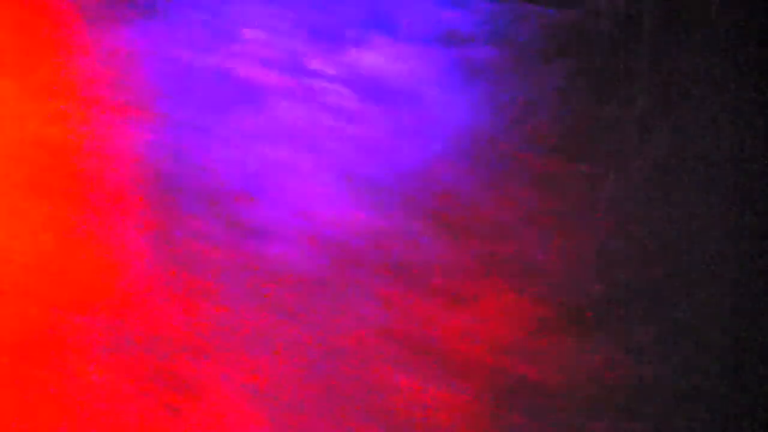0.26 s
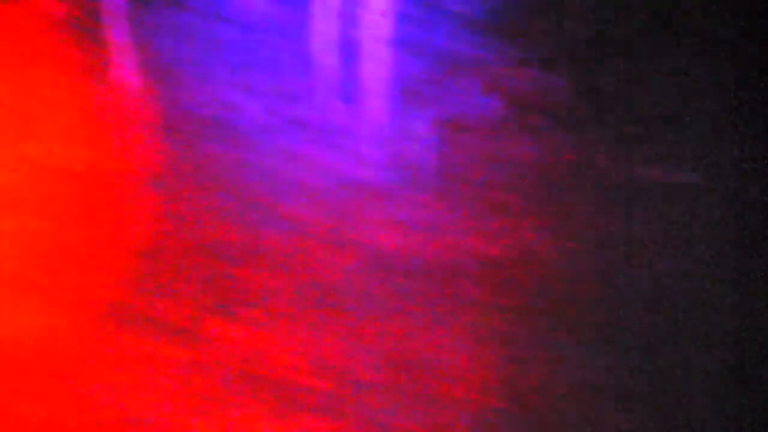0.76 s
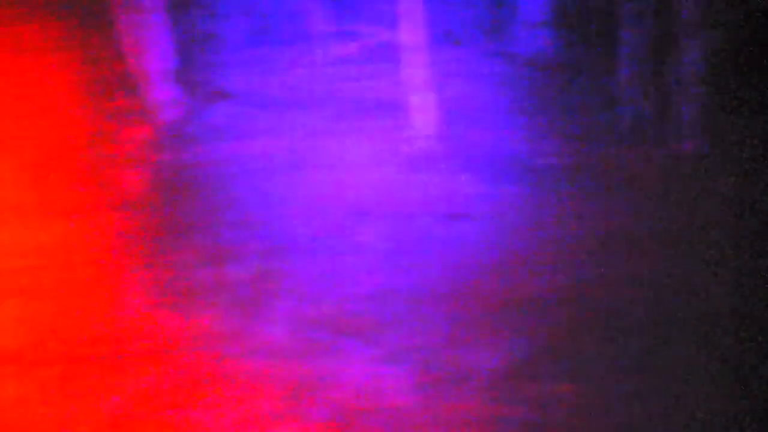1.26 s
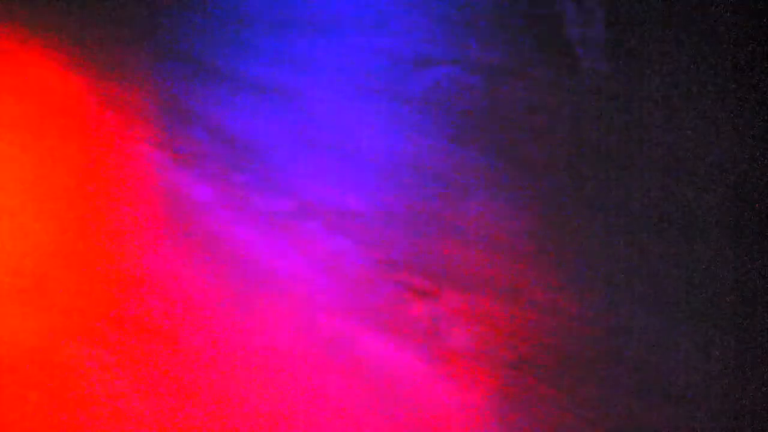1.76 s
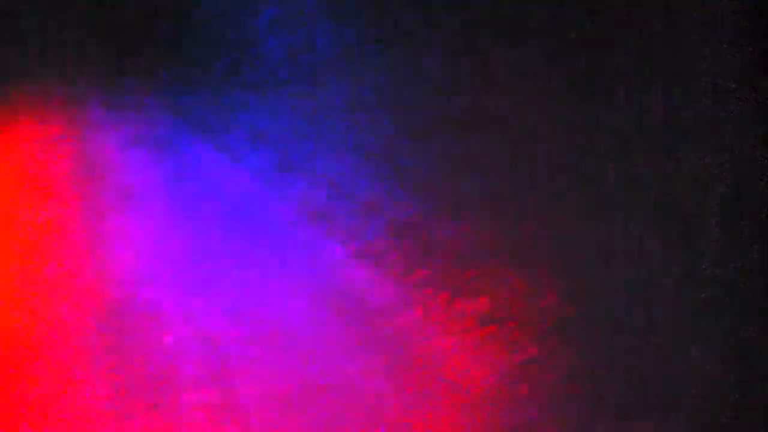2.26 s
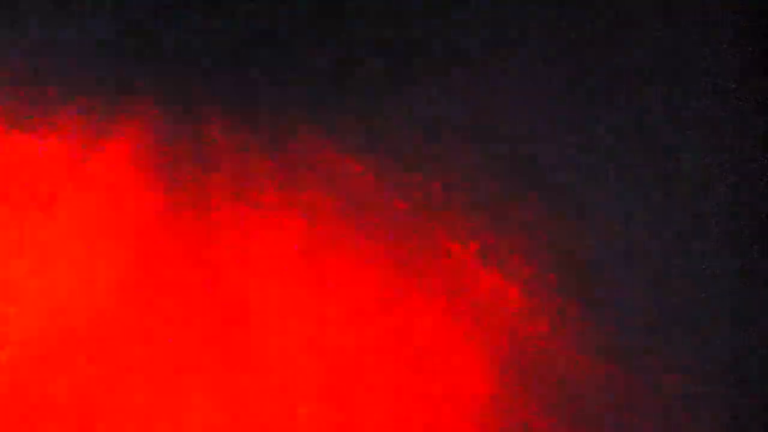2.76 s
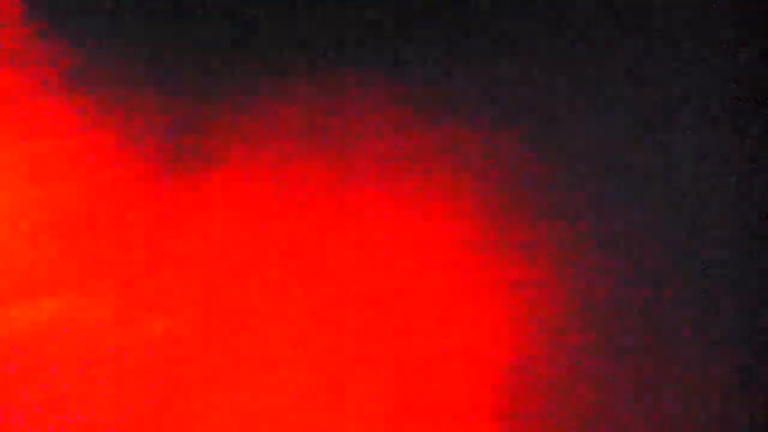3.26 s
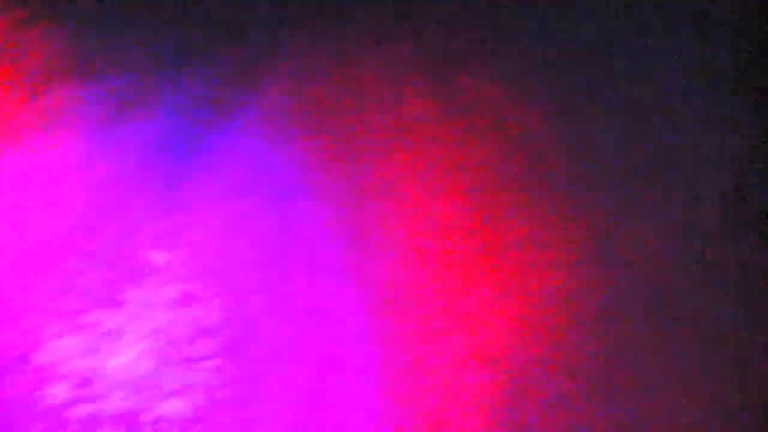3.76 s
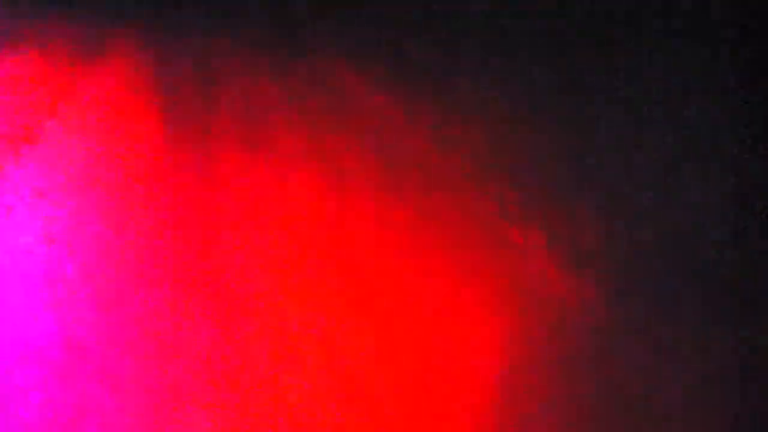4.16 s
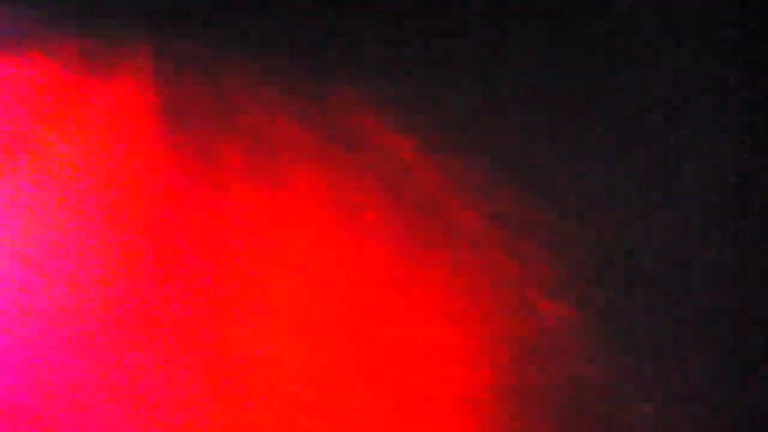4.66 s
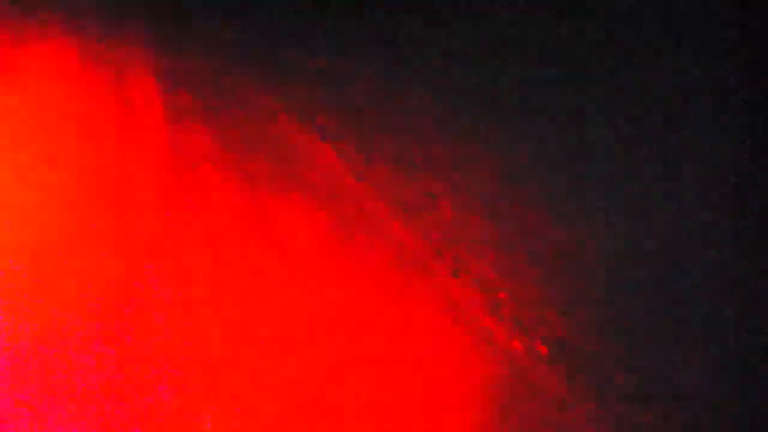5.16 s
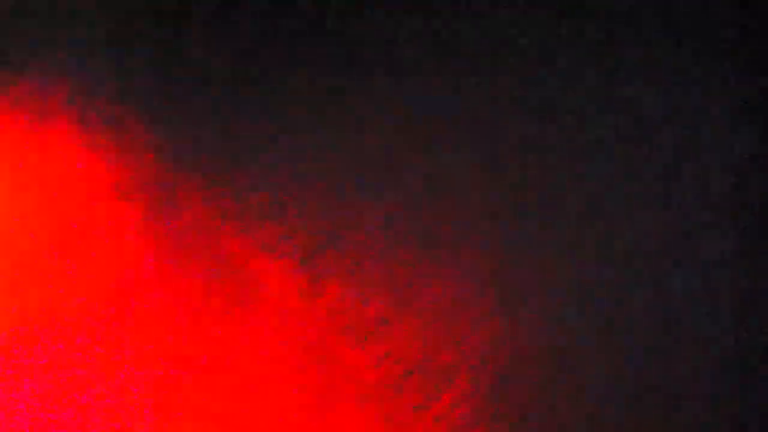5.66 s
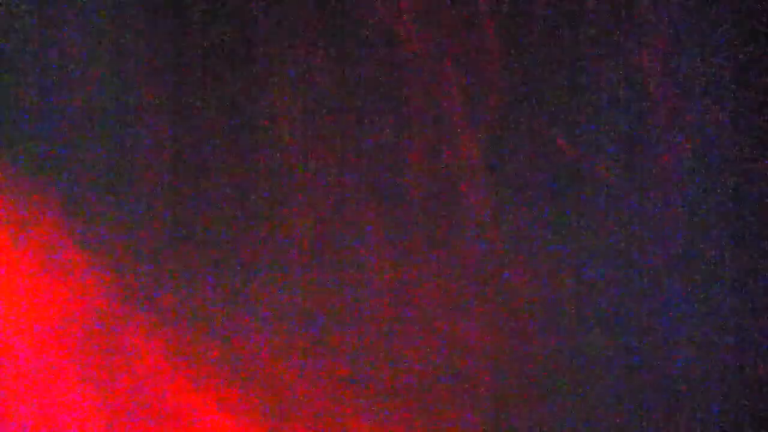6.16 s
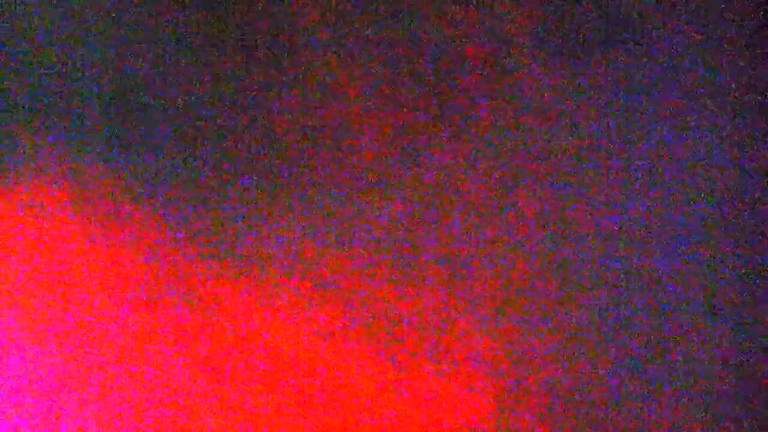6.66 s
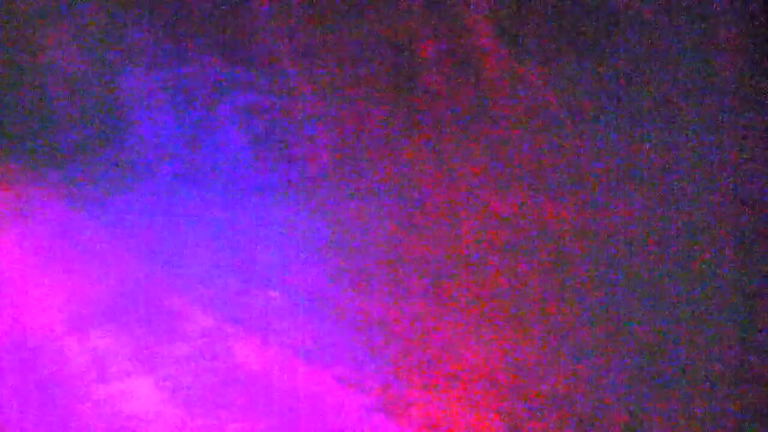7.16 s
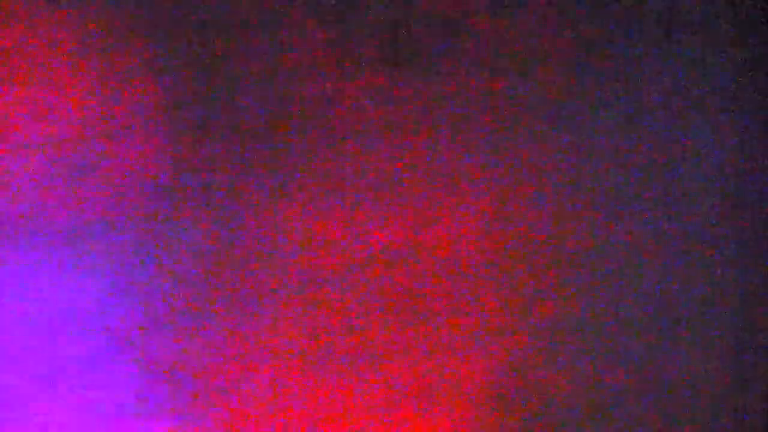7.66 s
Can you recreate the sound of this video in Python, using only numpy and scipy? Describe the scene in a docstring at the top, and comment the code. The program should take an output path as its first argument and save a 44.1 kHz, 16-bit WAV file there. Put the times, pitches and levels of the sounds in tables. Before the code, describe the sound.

Close footsteps scuff through dry leaves with crisp crackles and small twig snaps, sparse at first and much busier after about four seconds. Hard hollow plastic knocks and dull handling thuds interrupt. Crickets chirp and trill, high and thin, mostly to the left, over a distant insect chorus and faint hiss. Open night woodland with slight tree echo, captured by a handheld stereo microphone.

```python
"""Night walk through leaves

A walker carries a camera along a leafy woodland path. Leaves crush, crackle and rustle as bursts of noise
and snap as short rings; gear knocks and rubs ring the plastic housing's modes, and thuds are low noise.
Three chirping and three faster trilling crickets, and one that pips, are gliding sines with tree echoes;
behind them lie a far chorus of many sines and a bed of air and hiss made of filtered noise."""
import sys
import numpy as np
from scipy import signal
from scipy.fft import rfft, irfft
from scipy.io import wavfile
from scipy.ndimage import uniform_filter1d

SR = 44100
rng = np.random.default_rng(int(sys.argv[2]) if len(sys.argv) > 2 else 0)


def wrap_up_sound(samples):
    """Save the sound to the file named by the first command line argument, as 16-bit audio."""
    columns = np.atleast_2d(samples).T
    # keep every value between -1 and 1, then stretch to whole-number steps
    tamed = np.clip(columns, -1, 1)
    steps = np.round(tamed * 32767).astype(np.int16)
    wavfile.write(sys.argv[1], SR, steps)


N = 349272  # samples in the scene


def amp(db):
    """Decibels to a linear gain."""
    return 10 ** (np.asarray(db) / 20)


def evened(x):
    """Scale to an RMS of 1."""
    return x / np.sqrt(np.mean(x ** 2) + 1e-20)


def curves(rows):
    """Columns of a timed table, interpolated at every sample."""
    s, *columns = np.transpose(rows)
    return [np.interp(np.arange(N) / SR, s, c) for c in columns]


def panned(x, pan_db):
    """Stereo pair with the left pan_db louder than the right."""
    return np.array([x * amp(pan_db / 2), x * amp(-pan_db / 2)])


def add(mix, s, sound):
    """Lay a stereo sound into the mix at s seconds."""
    part = mix[:, max(round(s * SR), 0):][:, :sound.shape[1]]
    part += sound[:, :part.shape[1]]


def coloured(x, points):
    """Causal minimum-phase filter with the gain curve points (pitch_hz, gain_db)."""
    f, db = np.transpose(points)
    bins_hz = abs(np.fft.fftfreq(4096, 1 / SR))
    log_gain = np.interp(np.log(bins_hz + 1), np.log(f + 1), db) * np.log(10) / 20
    spectrum = np.exp(np.conj(signal.hilbert(log_gain)))
    taps = np.fft.ifft(spectrum).real[:2048]
    return signal.oaconvolve(x, taps[None], axes=1)[:, :N]


def rings(modes):
    """Sum of exponentially dying sine modes, peak 1."""
    t = np.arange(SR // 8) / SR
    x = sum(amp(db - 60 * t / t60) * np.sin(2 * np.pi * hz * t) for hz, db, t60 in modes)
    return x / abs(x).max()


def swells(s, held, peak_db, rest_db, rise_db_s, fall_db_s):
    """Gain of events that rise, hold and fall over a resting level, summed in power."""
    coarse = np.arange(0, N, 32)
    t = coarse / SR - np.asarray(s)[:, None]
    rise_db = rise_db_s * np.minimum(t, 0)
    fall_db = fall_db_s * np.maximum(t - np.asarray(held)[:, None], 0)
    db = np.asarray(peak_db)[:, None] + rise_db - fall_db
    gain = np.sqrt((amp(db) ** 2).sum(0) + amp(rest_db) ** 2)
    return np.interp(np.arange(N), coarse, gain)


def trees(x, t60=.4):
    """Trunks scatter sound back: sparse taps of random sign, other ones per channel."""
    slots = np.arange(400, SR // 3, 20)
    t = slots + rng.integers(0, 20, (2, len(slots)))
    taps = np.zeros((2, SR // 3 + 20))
    echoes = rng.choice([-1., 1.], t.shape) * amp(-60 * t / SR / t60)
    np.put_along_axis(taps, t, echoes, 1)
    return signal.oaconvolve(x, taps / np.linalg.norm(taps[0]), axes=1)[:, :N]


# scuffs of a shoe through the leaves: start_s [s], held_s [s],
# dull crush_db [dB], crisp crackle_db [dB], bright rustle_db [dB]
SCUFFS = [(0.09, 0.22, -50.5, -55.5, -55), (0.662, 0.033, -37, -40.5, -39), (1.361, 0.017, -44.5, -48, -46),
          (1.44, 0.025, -45.5, -58, -49), (2.04, 0, -45.5, -51, -62), (2.11, 0.0053, -46, -49, -62),
          (2.764, 0.0027, -48.5, -43, -43), (3.26, 0.19, -56, -63, -55), (3.314, 0.0087, -44, -43, -58),
          (3.841, 0.0049, -48, -49, -43.5), (3.9, 0.17, -52, -60, -53), (4.224, 0.13, -47.5, -76, -59),
          (4.366, 0.011, -50, -64, -40), (4.466, .12, -46.5, -46, -49), (4.625, 0.015, -50.5, -52, -45),
          (4.74, 0.071, -59, -45, -41), (4.812, 0.024, -52, -40, -42), (4.869, 0, -40.5, -40, -60),
          (4.905, 0, -45, -38, -45), (4.945, 0, -44, -48, -32.5), (5.057, 0.014, -39.5, -35, -32),
          (5.12, 0.11, -49.5, -49, -51), (5.3, 0.11, -54, -70, -58), (5.462, 0.029, -40.5, -55, -42.5),
          (5.501, 0, -34.5, -41, -37.5), (5.591, 0.017, -48.5, -46, -52), (5.657, 0.016, -46.5, -56, -51),
          (5.72, 0.0089, -43, -44.5, -45), (5.8, 0.011, -49, -37, -50), (5.85, 0.09, -52, -48.5, -48),
          (5.962, 0.058, -48.5, -53, -51), (6.11, 0.027, -59, -45, -46), (6.18, 0, -28, -24.5, -30.5),
          (6.226, 0, -61, -46, -38), (6.349, 0.016, -42, -42, -59), (6.828, 0, -42.5, -63, -41.5),
          (6.915, 0.02, -42.5, -49, -46), (6.97, 0.073, -53.5, -57, -51), (7.443, 0, -45.5, -56, -47),
          (7.535, 0, -47, -50, -51)]
# each triple: crush, crackle, rustle
SCUFF_RISE_DB_S, SCUFF_FALL_DB_S = (648, 702, 750), (400, 554, 600)
SETTLING_DB = (-64.5, -64.5, -58)  # resting level between scuffs
JOLT_DB, JOLT_S = -31.5, 0.0071  # a dull crush follows each knock, this far under it and this late


def scuffing():
    """Gains of crush, crackle and rustle as the shoe pushes through and the leaves settle."""
    s, held, *levels = np.transpose(SCUFFS)
    rules = zip(levels, SETTLING_DB, SCUFF_RISE_DB_S, SCUFF_FALL_DB_S)
    crush, crackle, rustle = (swells(s, held, *rule) for rule in rules)
    knock_s, knock_db = np.transpose(KNOCKS)[:2]
    jolts = swells(knock_s + JOLT_S, 0 * knock_s, knock_db + JOLT_DB, -np.inf,
                   SCUFF_RISE_DB_S[0], SCUFF_FALL_DB_S[0])
    return np.hypot(crush, jolts), crackle, rustle


def grains():
    """Many tiny breaks in clumps, a few large, each a noise burst dying over about half a millisecond."""
    clump = amp(3.5 * evened(uniform_filter1d(rng.standard_normal(N), 250)))
    size_db = 3 * np.minimum(rng.exponential(1, N), 4)
    breaks_now = rng.random(N) < 1500 * clump / SR
    burst = signal.lfilter([1], [1, -.96], amp(size_db) * breaks_now)
    shared, side = rng.standard_normal((2, N))
    return burst * (panned(shared, -2.6) + 0.13 * np.array([side, -side]))


# tone of each leaf layer: pitch_hz [Hz], gain_db [dB]
CRUSH = [(100, -6.5), (350, 4.5), (700, -0.5), (1090, 1), (1550, -4), (2500, -11), (9000, -112)]
CRACKLE = [(600, -32), (1550, -7), (2100, 5), (3180, -1), (4700, -0.5), (7000, -30)]
RUSTLE = [(1500, -30), (3500, -6), (4750, 0), (6400, -8), (8200, -17), (10600, -28), (15500, -44)]


def trodden_leaves():
    """Crush, crackle and rustle share the same tiny breaks, each through its own tone filter."""
    breaks = grains()
    crush, crackle, rustle = scuffing()
    # leaves also slide on leaves
    sliding = evened(breaks) + 1.1 * rng.standard_normal((2, N)) * amp([[-1.5], [1.5]])
    out = crush * evened(coloured(breaks, CRUSH))
    out += crackle * evened(coloured(sliding, CRACKLE))
    return out + rustle * evened(coloured(sliding, RUSTLE))


# single snaps of leaves and twigs: start_s [s], level_db [dB], pitch_hz [Hz],
# tick_db [dB relative to the body's level], left_minus_right_db [dB]
SNAPS = [(0.089, -19.5, 4230, -9.5, -1), (0.259, -23, 4150, -21, -2), (0.432, -16.5, 1400, -17, -2),
         (0.652, -22, 950, -25, 1), (0.677, -14.5, 4440, -21, 5), (0.694, -30, 1080, -21, 3),
         (0.705, -22.5, 1900, -24, -1), (1.103, -23.5, 1220, -25, -.5), (1.123, -29.5, 1280, -23, -1),
         (1.36, -22.5, 1080, -21, 0), (1.445, -31, 800, -22, -1), (1.458, -14, 860, -28, -.5),
         (1.475, -11, 1490, -31, -2.5), (1.486, -25, 2000, -22, -4), (1.625, -28, 1210, -25, -1),
         (1.654, -22, 1350, -31, -1), (2.337, -27, 2660, -26, -4), (2.399, -23, 4040, -30, -3),
         (2.762, -24, 2340, -10, 1), (3.31, -18, 1660, -25, -2), (3.515, -28.5, 3350, -7, -6),
         (3.714, -26, 3770, -24, .5), (3.829, -28, 3480, -18, 1), (3.886, -27, 695, -25, -1),
         (3.919, -10.5, 1480, -28, -3), (4.037, -25.5, 899, -26, -1), (4.053, -13, 1190, -34, -2),
         (4.222, -21.5, 900, -27, -1.5), (4.263, -15, 1280, -31, -1.5), (4.297, -21, 670, -24, -1),
         (4.356, -20, 1300, -22, -2), (4.373, -20.5, 1340, -22, -1), (4.402, -14.5, 700, -26, 0),
         (4.455, -24, 1210, -15, -4), (4.533, -18.5, 2000, -25, -1), (4.555, -19.5, 1190, -28, -1.5),
         (4.566, -19, 1100, -25, -1.5), (4.599, -32, 3540, -7, -2), (4.68, -54, 856, -20, -9),
         (4.821, -21.5, 1070, -17, -6), (5.058, -25, 1130, -14, -14), (5.087, -15, 4040, -17, -3),
         (5.159, -25, 1560, -23, -3), (5.18, -23, 1550, -21, -1), (5.469, -31, 4060, -17, -6),
         (5.495, -13.5, 810, -25, 1), (5.516, -21, 700, -22, 1), (5.532, -23, 1400, -18, -3),
         (5.597, -27, 3720, -23, 0), (5.728, -23, 2260, -26, -5), (5.767, -18, 1830, -14, -4),
         (5.856, -25, 4190, -14, -1), (5.912, -28, 3770, -21, -3), (5.961, -27, 990, -22, -15),
         (6.169, -31, 1380, -5, -9), (6.177, -13, 1570, -26, 5), (6.185, -4.5, 1350, -35, 0),
         (6.19, -8, 1050, -14.5, -12.5), (6.204, -26, 1300, -25, 1), (6.347, -17, 1600, -28, -6),
         (6.737, -22.5, 2000, -25, -5), (6.82, -23, 447, -15, -1.5), (6.904, -29, 3520, -17, -1),
         (6.925, -32, 500, -20, -1), (6.941, -30, 1500, -20, -3), (7.54, -22.5, 2960, -27, -.5)]
# tone of the dry treble tick of a snap: pitch_hz [Hz], gain_db [dB]
TICK = [(1500, -24), (4500, 0), (7000, -3), (10000, -12), (15500, -30)]
SNAP_CYCLES, SNAP_RING_S = 3.5, 0.002  # t60 of a snap: some cycles plus a short ring


def snaps():
    """A break rings for a few cycles at its pitch, with a dry noise tick on top."""
    out, t = np.zeros((2, N)), np.arange(600) / SR
    noises = rng.standard_normal((len(SNAPS), len(t)))
    ticks = coloured(noises * amp(-60 * t / 0.0073), TICK)[:, :len(t)]
    for (s, db, hz, tick_db, pan_db), tick in zip(SNAPS, ticks):
        body = np.sin(2 * np.pi * hz * t) * amp(-60 * t / (SNAP_CYCLES / hz + SNAP_RING_S))
        body = body * np.minimum(t * hz / 0.66, 1)  # the break opens within a cycle
        tick = amp(tick_db) * tick / abs(tick).max()
        add(out, s, panned(amp(db) * (body + tick), pan_db))
    return out


def leaves():
    """Trodden leaves and single snaps, with a short scatter of both off the trees."""
    out = trodden_leaves() + snaps()
    return out + amp(-18.0) * trees(out, t60=0.24)


# knocks on the housing: start_s [s], level_db [dB, of the ring],
# crack_db [dB relative to the ring], left_minus_right_db [dB]
KNOCKS = [(0.81, -8.5, -19.5, -6), (1.381, -27.5, -6, 0.5), (2.068, -9, -25, -6), (2.591, -34, -16, -3.0),
          (2.671, -12.5, -33, -5), (4.899, -7, 3.5, -6.5), (4.95, -1, 3, -7.5), (5.449, -17.5, -23, 2),
          (5.793, -10.5, -8, -8), (5.812, -4.5, 2.5, -6.5), (6.1, -30, -10, -4), (6.438, -5.5, -0.5, -5.5)]
# low modes of the plastic housing, also rung by the rubbing: pitch_hz [Hz], level_db [dB], t60_s [s]
HOUSING = [(93, -18.5, 0.064), (356, 1, 0.073), (562, 7.5, 0.021), (877, 5.5, 0.042), (1057, 10, 0.023)]
# bright modes of a crack: pitch_hz [Hz], level_db [dB], t60_s [s]
CRACK = [(1910, -42, 0.026), (2276, -7, 0.021), (2710, -1.5, 0.0067), (3470, -5.5, 0.0043),
         (4050, 0, 0.0047), (4790, 2.5, 0.003), (6240, -12, 0.012), (8200, -29.5, 0.028),
         (11000, -49, 0.0041)]


def knocks():
    """Each blow rings the same low housing modes, and a rattle of tiny contacts excites the bright ones."""
    out, ring, bright = np.zeros((2, N)), rings(HOUSING), rings(CRACK)
    t = np.arange(len(ring)) / SR
    rise = np.minimum(t / 0.00069, 1)  # the contact builds up
    rattle_shape = rise[:200] * amp(-60 * t[:200] / 0.0099)
    noises = rng.standard_normal((len(KNOCKS), 200))
    for (s, db, crack_db, pan_db), noise in zip(KNOCKS, noises):
        rattle = uniform_filter1d(noise, size=3) * rattle_shape
        crack = np.convolve(rattle, bright)[:len(t)]
        crack = amp(crack_db) * crack / abs(crack).max()
        add(out, s, panned(amp(db) * (rise * ring + crack), pan_db))
    return out


# gear rubbing along the housing: start_s [s], held_s [s], level_db [dB]
RUBS = [(0.262, 0.014, -54), (3.2, 0.13, -51.5), (4.33, .12, -58), (4.62, 0.058, -48.5), (4.71, 0.076, -46),
        (4.82, 0.059, -39.5), (5.65, 0.028, -51.5), (5.96, 0.017, -52), (6.105, .03, -48.5),
        (6.2, 0.016, -54)]
RUB_RISE_DB_S, RUB_FALL_DB_S = 900, 350


def rubbing():
    """Uneven slips keep the housing modes ringing."""
    unevenness_db = 4 * evened(uniform_filter1d(rng.standard_normal(N), 200))
    slips = evened(rng.standard_normal(N) * amp(unevenness_db))
    slips = slips * swells(*np.transpose(RUBS), -np.inf, RUB_RISE_DB_S, RUB_FALL_DB_S)
    ring = rings(HOUSING)
    return panned(signal.oaconvolve(slips, ring / np.linalg.norm(ring))[:N], -4.5)


def shaded(x, hz=380):
    """Long waves bend round the housing and reach both ports equally loud."""
    low = signal.filtfilt(*signal.butter(2, hz, fs=SR), x)
    return x - (low - low.mean(0))


# footfalls and handling felt through the grip: start_s [s], deep_db [dB], upper_db [dB]
THUDS = [(0.17, -42, -70), (0.289, -40, -35.5), (0.75, -45, -65), (0.811, -54, -38.5), (1.39, -39, -45),
         (1.5, -45, -72), (2.01, -44, -45.5), (2.07, -38.5, -43), (2.6, -46, -62), (2.69, -43, -39),
         (3.0, -58, -61), (3.37, -40.5, -68), (3.51, -52.5, -53), (3.902, -40, -50), (3.99, -46, -47),
         (4.26, -50.5, -52), (4.37, -50, -52), (4.45, -50, -47), (4.592, -44, -67), (4.65, -59, -39),
         (4.75, -48, -40), (4.85, -46, -38), (4.96, -47, -33), (5.07, -54, -34), (5.18, -45, -54),
         (5.47, -62, -52), (5.56, -56, -66), (5.65, -53, -42.5), (5.69, -39, -53), (5.82, -57, -36.5),
         (5.96, -46, -40.5), (6.11, -38, -38.5), (6.198, -36, -34), (6.29, -33.5, -41), (6.46, -47, -54),
         (6.81, -65, -49.5), (6.9, -46, -71), (7.04, -47, -75), (7.45, -45, -72), (7.52, -34.5, -50),
         (7.7, -54, -63)]
DEEP_RISE_DB_S, DEEP_FALL_DB_S, UPPER_RISE_DB_S, UPPER_FALL_DB_S = 261, 186, 402, 328
SWAY_DB = (-68, -70.5)  # deep and upper shaking between thuds


def thuds():
    """Lumpy low shaking of the housing; the deepest part is the same in both channels."""
    s, deep_db, upper_db = np.transpose(THUDS)
    deep_gain = swells(s, 0 * s, deep_db, SWAY_DB[0], DEEP_RISE_DB_S, DEEP_FALL_DB_S)
    upper_gain = swells(s, 0 * s, upper_db, SWAY_DB[1], UPPER_RISE_DB_S, UPPER_FALL_DB_S)
    a, b, c = rng.standard_normal((3, N))
    sides = np.array([b + 0.25 * c, b - 0.22 * c])
    # tone points: (Hz, dB)
    deep = coloured(a[None], [(8, -7.5), (28, 8.5), (55, -26.0), (90, -21), (300, -76)])
    upper = coloured(sides, [(30, -46.0), (65, -5), (92, 0.0), (150, -12.5), (300, -28.0), (900, -75)])
    return deep_gain * evened(deep) + upper_gain * evened(upper)


def stroke(shape):
    """One wing stroke: a near sine gliding along its pitch and level curve."""
    s, hz, db = np.transpose(shape)
    t = np.arange(0, s[-1], 1 / SR)
    phase = 2 * np.pi * np.cumsum(np.interp(t, s, hz)) / SR
    return amp(np.interp(t, s, db)) * np.sin(phase) * signal.windows.tukey(len(t), .2)


def cricket(rows, shape, period, onward=False):
    """Evenly paced wing strokes through the rows, each a little stronger or weaker."""
    rows = np.array(rows, float)
    if onward:  # it keeps singing at the same pace for eight more strokes
        rows = np.vstack([rows, rows[-1] + [8 * period, 0, 0]])
    number = np.r_[0, np.cumsum(np.round(np.diff(rows[:, 0]) / period))]
    k = np.arange(number[-1])
    s, left_db, pan_db = (np.interp(k, number, c) for c in rows.T)
    uneven_db = 1.1 * rng.standard_normal((len(k), 2))
    out, sound = np.zeros((2, N)), stroke(shape)
    knots = np.linspace(0, len(sound), 7)
    wobble_db = 2.2 * rng.standard_normal((len(k), 7))  # the wing grips unevenly along a stroke
    for at, db, pan, (level_off, pan_off), wobble in zip(s, left_db, pan_db, uneven_db, wobble_db):
        grip = amp(np.interp(np.arange(len(sound)), knots, wobble))
        channels_db = db + level_off - np.array([[0], [pan + pan_off]])
        add(out, at, amp(channels_db) * grip * sound)
    return out


# chirping crickets; rows fall on a wing stroke, even strokes fill the gaps:
# start_s [s], level_db [dB, left channel], left_minus_right_db [dB]
CHIRP_QUICK = [(0.032, -31.5, 6), (0.213, -33, 5), (0.39, -42.5, 14), (0.572, -39, 18), (1.48, -38, 4.5),
               (2.204, -35.5, 8), (2.368, -53, 11), (3.073, -45, 8), (3.781, -48, 16), (4.319, -40, 1),
               (5.038, -50, 10), (5.382, -39, 6), (5.916, -34, 4), (6.096, -33, 5), (6.808, -33, 9),
               (7.166, -30, 6), (7.703, -29, 10), (7.88, -28.5, 21)]
CHIRP_SLOW = [(2.292, -38.5, 6.6), (2.718, -44, 7.1), (3.135, -36, 5.8), (3.414, -36.5, 6),
              (3.973, -32, 7.4), (4.256, -34, 5.4), (4.535, -26.5, 8), (4.677, -30, 10), (4.82, -31, 10),
              (5.107, -36, 6), (5.248, -30, 6.1), (5.669, -28, 15), (5.952, -26.5, 14), (6.095, -38, 11),
              (6.385, -33, 7.3)]
CHIRP_FAINT = [(3.264, -44, 5), (3.765, -44, 5), (4.031, -48, 5), (4.28, -38, 4.6), (4.797, -39, 5),
               (5.048, -41, 5), (5.565, -32.5, 5), (5.827, -30, 5), (6.088, -42, 5)]
# trilling crickets, same columns: start_s [s], level_db [dB, left channel], left_minus_right_db [dB]
TRILL_EARLY = [(0.008, -37.5, 7), (0.115, -37.5, 3), (0.222, -37.5, 5), (0.436, -39.5, -1),
               (0.545, -44, -3), (0.654, -42, 7), (0.762, -46, 6)]
TRILL_MIDDLE = [(1.213, -47, 7), (1.613, -51, 5), (2.022, -47, 4), (2.419, -52, 4.3), (2.821, -47, 7),
                (3.226, -46, 8), (3.631, -49, 7), (4.031, -46, 8), (4.439, -51, 7), (4.849, -42, 2),
                (5.255, -44, 4), (5.666, -43, 4), (6.074, -45, 5), (6.484, -40.5, 7), (6.685, -41, 6),
                (6.786, -40, 5)]
TRILL_LATE = [(6.806, -45, 3), (6.969, -43, 3), (7.294, -43.5, 3), (7.456, -42, 3), (7.62, -40, 6),
              (7.785, -37, 6.8)]
# a fainter cricket that only pips now and then: start_s [s], level_db [dB]
PIPS = [(0.2798, -42), (0.3352, -41), (0.394, -40.5), (0.458, -41), (0.512, -40), (0.5686, -41.5),
        (2.5994, -48), (2.652, -45), (2.694, -44), (2.7525, -48), (2.7766, -51), (2.831, -47),
        (2.9158, -47)]
# one wing stroke of each singer; the late fall of a chirp is the scraper slowing:
# time_s [s from the stroke's start], pitch_hz [Hz], level_db [dB]
STROKE_QUICK = [(0, 5200, -7), (.006, 5440, -2), (.013, 5500, 0), (.022, 5420, 0), (.031, 5080, -5),
                (.040, 4600, -17)]
STROKE_SLOW = [(0, 5280, -8), (.008, 5380, -1), (.017, 5290, 0), (.025, 5000, -2), (.033, 4620, -10)]
STROKE_FAINT = [(0, 5250, -8), (.012, 5440, 0), (.021, 5350, -1), (.030, 5000, -3), (.037, 4650, -11)]
STROKE_EARLY = [(0, 4620, -5), (.004, 4330, 0), (.011, 3900, -3)]
STROKE_MIDDLE = [(0, 5050, -7), (.005, 4700, 0), (.012, 4200, -6)]
STROKE_LATE = [(0, 5050, -6), (.005, 4750, 0), (.012, 4250, -7)]
STROKE_PIP = [(0, 3900, -5), (.008, 3940, 0), (.04, 3880, -6)]
# seconds from stroke to stroke
QUICK_S, SLOW_S, FAINT_S = .0595, .0703, .0642
EARLY_S, MIDDLE_S, LATE_S = .01788, .01687, .0204


def crickets():
    """The near singers rub their wings stroke by stroke; the trees echo them."""
    near = cricket(CHIRP_QUICK, STROKE_QUICK, QUICK_S, onward=True)
    near += cricket(CHIRP_SLOW, STROKE_SLOW, SLOW_S)
    near += cricket(CHIRP_FAINT, STROKE_FAINT, FAINT_S)
    near += cricket(TRILL_EARLY, STROKE_EARLY, EARLY_S)
    near += cricket(TRILL_MIDDLE, STROKE_MIDDLE, MIDDLE_S)
    near += cricket(TRILL_LATE, STROKE_LATE, LATE_S, onward=True)
    for s, db in PIPS:
        add(near, s, panned(amp(db) * stroke(STROKE_PIP), 1.1))
    near[1] = np.roll(near[1], 2)  # they sit to the left, so the right ear hears them two samples later
    return near + amp(-21.5) * trees(near)


# far chorus: time_s [s], high_db [dB], middle_db [dB], low_db [dB]
CHORUS = [(0, -55, -50.5, -62), (0.5, -56, -54, -60), (0.95, -52, -47.5, -61), (1.3, -66, -52.5, -65.5),
          (1.96, -59, -52, -56), (2.43, -70, -51.5, -60.5), (2.7, -57, -49, -62.5), (3.3, -62, -49.5, -64),
          (3.84, -59, -52.5, -57.5), (4.4, -54, -53, -58), (4.9, -59, -52.5, -61), (5.6, -51, -52.5, -60),
          (5.93, -58, -51.5, -59), (6.66, -55, -48, -58), (7.37, -54, -52, -60.5),
          (7.92, -72, -49.5, -55.5)]
# high, middle and low choir: pitch_hz [Hz], spread_hz [Hz either way],
# fall_hz [Hz, over one stroke cycle], pace [mean strokes per s]
CHOIRS = [(4700, 460, 650, 50), (3542, 300, 420, 45), (1945, 73, 60, 37)]


def chorus():
    """Each choir is a dozen far singers at their own pitch and pace, blurred by the trees."""
    out, t = np.zeros((2, N)), np.arange(N) / SR
    for (hz, spread_hz, fall_hz, pace), level_db in zip(CHOIRS, curves(CHORUS)):
        choir = np.zeros((2, N))
        for place, (speed, start, side) in zip(np.linspace(-1, 1, 12), rng.random((12, 3))):
            turn = (pace * (.7 + .6 * speed) * t + start) % 1  # position within the stroke cycle
            pitch = hz + spread_hz * place * abs(place) + fall_hz * (.35 - turn)
            swell = np.sin(np.pi * np.minimum(turn / 0.74, 1))  # silent for the rest of the cycle
            song = np.sin(2 * np.pi * np.cumsum(pitch) / SR) * swell
            choir += panned(song, 9 * (side - .5))
        # singers join and drop out
        drift_db = 1.75 * evened(uniform_filter1d(rng.standard_normal(N), size=3000))
        out += amp(level_db + drift_db) * evened(choir + amp(-0.5) * trees(choir))
    return out


# tone of air and hiss: pitch_hz [Hz], gain_db [dB]
NIGHT = [(15, -19), (25, 1), (75, -5.5), (290, -4.5), (800, -10.5), (1500, -10.5), (2850, -13.5),
         (4000, -5.5), (5500, -1), (6100, -25.5), (8600, -19), (16000, -21.5)]
NIGHT_DB = -48  # RMS level
# how alike the two channels are: pitch_hz [Hz], likeness [0-1]
NIGHT_SAME = [(60, 0.19), (300, 0.2), (1400, 0.65), (3100, 0.055), (6800, 0.024), (12000, 0.014)]


def night():
    """Still air and microphone hiss: filtered noise whose channels share a part that varies with pitch."""
    left, other = rng.standard_normal((2, N))
    hz, (f, same) = np.fft.rfftfreq(N, 1 / SR), np.transpose(NIGHT_SAME)
    same = np.interp(np.log(hz + 1), np.log(f), same)
    right = irfft(same * rfft(left) + np.sqrt(1 - same ** 2) * rfft(other), N)
    return amp(NIGHT_DB) * evened(coloured(np.array([left, right]), NIGHT))


def scene():
    """Insects and night air, with the leaves, gear and thuds close by."""
    close = shaded(leaves() + knocks() + rubbing())
    return crickets() + chorus() + night() + close + thuds()


NOTCH_HZ, NOTCH_WIDTH_HZ, NOTCH_DEPTH = 7730, 420, .95  # depth 0-1
DUCK_ABOVE_DB, RECOVERY_DB_S = -15.5, 61.0
EDGE_HZ = 15830  # upper band limit


def record(dry):
    """Port notch, gain control that ducks after loud blows, overload, then the band limit."""
    # the microphone port cancels a narrow band
    peak = signal.iirpeak(NOTCH_HZ, NOTCH_HZ / NOTCH_WIDTH_HZ, SR)
    heard = dry - NOTCH_DEPTH * signal.lfilter(*peak, dry)
    peak_db = 20 * np.log10(abs(heard).max(0) + 1e-9)
    fall = np.arange(N) * RECOVERY_DB_S / SR
    held_db = np.maximum.accumulate(peak_db + fall) - fall
    over_db = np.maximum(held_db - DUCK_ABOVE_DB, 0)
    late_db = np.r_[np.zeros(200), uniform_filter1d(over_db, 300)[:-200]]  # it acts just after the blow
    ducked = heard / amp(.25 * late_db)  # a quarter of the excess is taken off
    overloaded = np.clip(ducked, -.94, .94)  # the hardest blows overload the input
    low_pass = signal.firwin(511, EDGE_HZ, window=("kaiser", 9), fs=SR)
    return signal.oaconvolve(overloaded, low_pass[None], "same")


dry = scene()
out = record(dry)
wrap_up_sound(out)
```